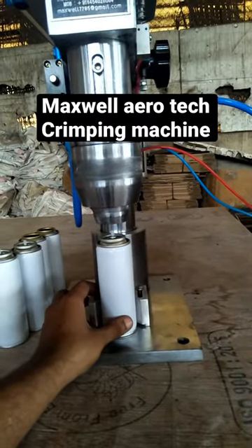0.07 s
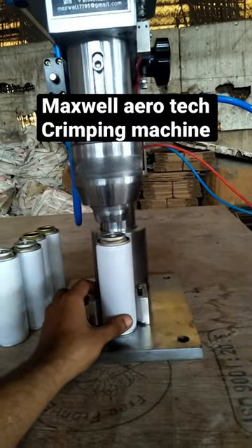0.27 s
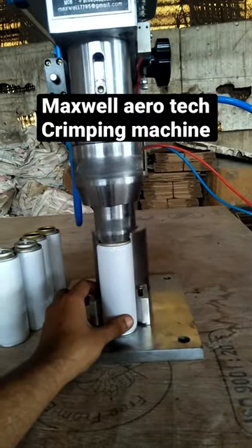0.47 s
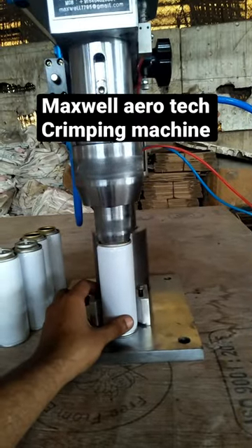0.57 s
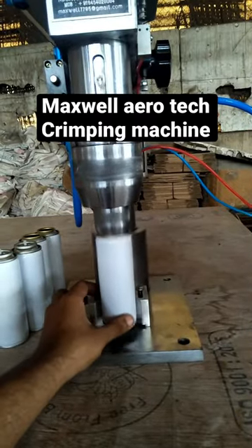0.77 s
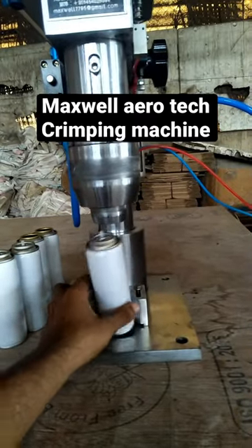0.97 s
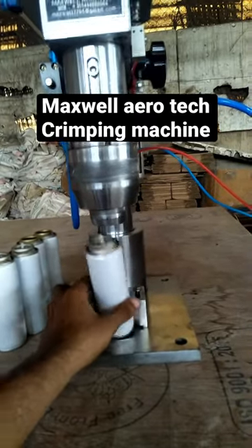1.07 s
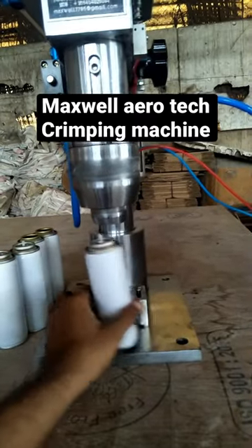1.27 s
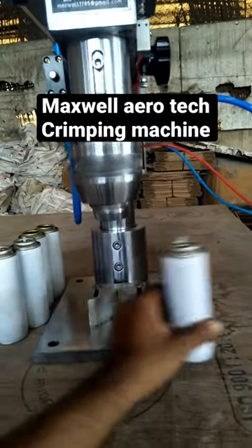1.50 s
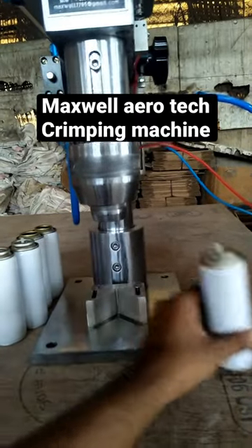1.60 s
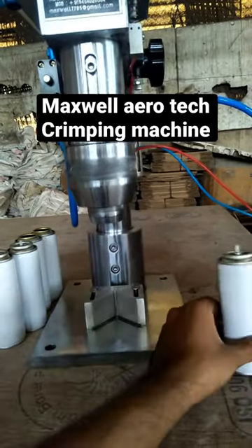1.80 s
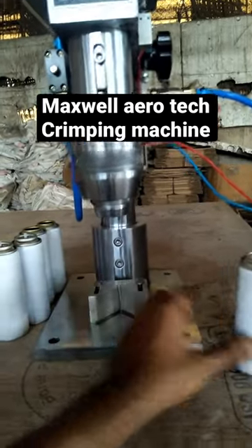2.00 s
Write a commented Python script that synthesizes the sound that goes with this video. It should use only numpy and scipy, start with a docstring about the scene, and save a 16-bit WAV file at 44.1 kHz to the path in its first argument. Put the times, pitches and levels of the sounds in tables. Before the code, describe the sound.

A pneumatic press lets out a loud two-stage hiss of air with thumps and metal clacks. The hiss cuts off, and a can rattles, clinks, scrapes and is set on a wooden bench in a slightly echoing workshop.

```python
"""In a workshop, a pneumatic press on a wooden bench crimps an aerosol can.
A valve pops and turbulent air hisses through a resonant port as the ram goes down, then brighter as it
returns; at each stage the ram thumps and shakes the bench. The freed can rattles against the steel head,
ringing in its normal modes, clinks and scrapes out of its holder, and is set down on the wooden top.
The room reverberates over a low background rumble."""
import sys
import numpy as np
from scipy import signal
from scipy.fft import rfft, irfft, next_fast_len
from scipy.io import wavfile
from scipy.ndimage import uniform_filter1d, map_coordinates

SR = 44100
rng = np.random.default_rng(int(sys.argv[2]) if len(sys.argv) > 2 else 0)


def int16_out(signal):
    """Quantize to a 16-bit WAV file."""
    q = np.round(np.clip(np.atleast_2d(signal).T, -1, 1) * 32767)
    wavfile.write(sys.argv[1], SR, q.astype(np.int16))


N = 90404
T = np.arange(N) / SR

# Exhaust strokes. Each row: opening and shutting times in seconds, level in dB, opening surge in dB.
STROKES = [(.204, .585, -21, 10), (.590, .888, -19.5, -1)]
# Spectra of the two jets and the shaking frame. Each row: frequency in Hz, relative level in dB.
DOWN_JET = [(88, -30.5), (150, -2.5), (264, -17), (430, -17), (598, -26.5), (937, -5.5), (1330, -16),
            (1750, -15.5), (2430, 0), (2790, -5.5), (3260, -14), (4040, -16.5), (4630, -26.5),
            (5300, -24.5), (6900, -34.5), (9300, -20.5), (12000, -30), (15800, -34)]
RETURN_JET = [(88, -37), (150, -12.5), (169, -25), (330, -12.5), (575, -19), (937, -9), (1120, -15.5),
              (1550, -9), (1780, -12.5), (2390, -4), (2900, -3.5), (3300, -16.5), (4040, -12.5),
              (4650, -26.5), (5410, -23), (6970, -30.5), (9000, -23), (12200, -26), (15800, -28)]
FRAME_SPECTRUM = [(30, -19), (55, -6.5), (90, 5), (130, -3), (200, -23), (400, -42.5)]
# Resonances of the exhaust ports. Each row: frequency in Hz, bandwidth in Hz, relative level in dB.
DOWN_PORT = [(866, 100, -23.5), (1597, 16, -17), (1904, 46, -13), (2334, 70, -12.5), (2401, 45, -3.5),
             (2521, 54, -5.5), (2722, 38, -2), (2978, 37, -8), (4950, 62, -29), (10340, 260, -34.5)]
RETURN_PORT = [(940, 100, -12), (1341, 70, -12), (1966, 52, -3), (2323, 80, -0.5), (2440, 80, -1),
               (2883, 67, -1.5), (3570, 200, -17), (4013, 130, -12.5), (5300, 180, -21), (12200, 400, -28)]
# Thumps of the ram. Each row: start in seconds, level in dB, pitch in Hz, cycles to the envelope's peak.
THUMPS = [(0.2055, -12, 233, 0.82), (.315, -26.5, 90, 0.99), (0.4426, -15, 193, 0.52),
          (0.5835, -12, 222, 0.61), (0.724, -20.5, 321, 1), (.871, -19, 105, 1.12),
          (0.900, -22.5, 129, 1.14)]
# Hard metal contacts. Each row: start in seconds, level in dB, pitch in Hz, relative can ring in dB.
CLACKS = [(0.2019, -11.5, 1260, -29), (0.4394, -11.5, 2170, -13.5), (0.5862, -15, 1970, -30),
          (0.9182, -4.5, 2060, -16), (.9780, -12, 1930, -20.5), (1.0267, -18, 1920, -20),
          (1.073, -39.5, 2130, -24.5), (1.0927, -21, 2010, -27.5), (1.1007, -28, 1920, -24)]
# Taps of the can on the holder and on the bench. Each row: start in seconds, level in dB.
CLINKS = [(1.333, -33.5), (1.3474, -41)]
KNOCKS = [(1.6446, -26), (1.6583, -39)]
# Normal modes. Each row: frequency in Hz, relative level in dB, time to decay by 60 dB in seconds.
CAN_MODES = [(1631, -11, 0.2), (2296, -5, 0.14), (2729, 0.5, 0.19), (2864, -6.5, 0.35), (2810, -19, 0.7),
             (3250, -4.5, 0.16), (9200, -37.5, .06), (12500, -22, 0.05)]
RIM_MODES = [(5480, -36, 0.053), (9000, -39, .06), (12410, -30, .05)]
HOLDER_MODES = [(427, -12, 0.042), (1090, -21, 0.25), (1195, -14.5, 0.1), (1870, -22, 0.062),
                (2100, -4, 0.081), (2360, -2, 0.052), (2683, 6.5, 0.042), (2837, 9, 0.015)]
BENCH_MODES = [(139.8, -4, 0.54), (256.5, -4.5, 0.55), (323, -3.5, .29), (430, -21, .28), (567, 1, 0.3),
               (800, -3.5, 0.5), (848, -12, 0.74), (910, -3.5, 0.6), (1052, 6.5, 0.19), (1145, 12.5, 0.15),
               (1352, -3, .2), (1760, 7, 0.088), (2150, 5, 0.068), (2370, 6, 0.09)]
# Spectra of impact noise. Each row: frequency in Hz, relative level in dB.
SHUDDER_SPECTRUM = [(40, -26), (85, -7), (200, -2.5), (400, -5), (650, -18.5), (2000, -66)]
METAL_CRACK = [(60, -40.5), (400, -9), (1000, -4), (2000, 7), (4000, -29.5), (7000, -46), (13000, -26),
               (16000, -45)]
KNOCK_CRACK = [(300, -17.5), (1100, -1), (1450, -2), (2200, 2), (2850, -9.5), (3400, -38), (8000, -47)]
WOOD_SPECTRUM = [(60, -17), (140, -8.5), (430, -11.5), (700, -6), (1100, -1), (1600, -9), (2200, -22),
                 (2800, -18.5), (3500, -35), (3950, -32), (4400, -52), (8000, -68.5)]
# Envelopes of the can's scrape, dragging base and handling. Each row: time in seconds, level in dB.
SCRAPE_LEVEL = [(1.35, -49), (1.40, -62), (1.46, -64.5), (1.495, -64), (1.518, -49), (1.54, -59.5),
                (1.56, -55.5), (1.585, -70.5), (1.63, -71)]
DRAG_LEVEL = [(1.50, -90), (1.513, -68), (1.56, -60.5), (1.59, -72.5), (1.64, -71.5)]
HANDLING_LEVEL = [(1.30, -75), (1.40, -54.5), (1.46, -80), (1.53, -80), (1.59, -88), (1.64, -82)]
# Spectra of those three and of the sliding rim. Each row: frequency in Hz, relative level in dB.
SCRAPE_SPECTRUM = [(120, -53), (200, -23), (312, -18.5), (440, -38), (677, -14), (885, -13.5), (968, -22.5),
                   (1140, -3.5), (1470, -23.5), (1680, -14.5), (2660, -7), (3640, -37), (7000, -61),
                   (9100, -71), (15400, -120)]
DRAG_SPECTRUM = [(200, -28.5), (330, -8), (480, -21), (690, -0.5), (800, 0.5), (950, -11), (1150, -2),
                 (1600, -36)]
HANDLING_SPECTRUM = [(40, -14.5), (100, -9.5), (140, 1.5), (200, -30.5), (320, -17.5), (500, -27.5),
                     (1500, -62.5)]
SLIDE_SPECTRUM = [(4300, -27), (5500, -11), (7600, -29), (8700, -12), (9100, -4), (9800, -21), (11900, -9),
                  (12500, 2), (13100, -10), (15800, -12)]
# Decay of the workshop's echo. Each row: frequency in Hz, reverberation time in seconds.
ROOM_T60 = [(100, .7), (300, .6), (900, .58), (2000, .48), (5000, .45), (12000, .38)]
# Colour of the echo and of the background. Each row: frequency in Hz, relative level in dB.
ROOM_GAIN = [(50, -20), (110, -12.5), (500, -7.5), (1200, -14.5), (2700, -17), (5000, -14), (12000, -20.5)]
BACKGROUND_SPECTRUM = [(25, -12), (60, 2.5), (130, 0.5), (200, -13.5), (400, -15.5), (900, -16.5),
                       (2200, -20.5), (3500, -29.5), (6000, -45), (15800, -48.5)]
# Threshold of the noise suppressor. Each row: frequency in Hz, power density in dB per Hz.
QUIET_THRESHOLD = [(140, -118), (300, -105), (600, -102), (1000, -104), (2500, -106), (4000, -125),
                   (8000, -145)]

CRACK_T60, CONTACT_RISE_S = .018, .0007  # decay and onset of a contact, both in seconds


def exhaust(stroke, spectrum, port):
    """Turbulence makes broadband noise, which excites the port's resonances; the flow shakes the frame."""
    opens, shuts, db, surge_db = stroke
    surge_s, crossover_hz, port_db, port_tilt = .018, 3600, 2, .15

    def port_response(f):
        resonances = sum((-1) ** k * amp(gain) * 1j * f * width / (hz * hz - f * f + 1j * f * width)
                         for k, (hz, width, gain) in enumerate(port))
        return resonances * amp(along(spectrum, f) * port_tilt)

    hollow = unit(filtered(rng.standard_normal(N), port_response))
    jet = unit(noise(spectrum) + amp(port_db) * hollow)
    body = filtered(jet, lambda f: 1 / (1 + (f / crossover_hz) ** 8))
    # The treble builds up later than the body and starts to fade later.
    fizz = (jet - body) * rise(.013, opens) * fade(.058, shuts + .022)
    flow = amp(db + surge_db * np.exp(-np.maximum(T - opens, 0) / surge_s) - .9 * wobble(60))
    closing = fade(.14, shuts)
    rumble = amp(-39.5) * noise(FRAME_SPECTRUM) * rise(.14, opens) * closing
    return rumble + flow * (body * rise(.001, opens) * closing + fizz)


def ram():
    """A short force pulse shakes the frame and leaves the bench humming in free vibration."""
    out = np.zeros(N)
    for s, db, hz, cycles in THUMPS:
        progress = T * hz / cycles
        push = np.sin(2 * np.pi * hz * T) * progress ** 2 * np.exp(1 - progress ** 2)
        shudder = amp(-8.5) * noise(SHUDDER_SPECTRUM) * fade(t60=.11)
        hum = amp(-21.5) * ping(hz=140.44, t60=.72)
        out += amp(db) * at(s, push + (shudder + hum) * rise(.003))
    return out


def clacks():
    """A hard impact is broadband: metal on metal gives a damped click, a crack and the can's ring."""
    click_top_hz = 4170
    out = np.zeros(N)
    for s, db, hz, ring_db in CLACKS:
        click = at(s, 3.6 * ping(hz, t60=.0046) * rise(.00039))
        click = filtered(click, lambda f: 1 / (1 + (f / click_top_hz) ** 6))
        crack = amp(-10) * noise(METAL_CRACK) * fade(CRACK_T60)
        # A fast random flutter makes the can's ring rough.
        can = amp(ring_db) * ring(CAN_MODES) * (1 + .4 * wobble(150))
        out += amp(db) * (click + at(s, (crack + can) * rise(.00049)))
    return bass_cut(out, hz=850)


def clinks():
    """Light impacts excite the modes of the holder and the thin overtones of the can's rim."""
    out = np.zeros(N)
    for s, db in CLINKS:
        holder = ring(HOLDER_MODES) + amp(-8) * noise(METAL_CRACK) * fade(t60=.06)
        tap = softened(at(s, holder) * rise(CONTACT_RISE_S, s))
        rim = at(s, ring(RIM_MODES) * (1 + .97 * wobble(480)) * rise(.0005))
        out += amp(db) * bass_cut(tap + rim, hz=490)
    return out


def set_down():
    """The can's rim strikes the wooden top, whose modes take a moment to build up and then ring on."""
    out = np.zeros(N)
    for s, db in KNOCKS:
        top = amp(-21) * ring(BENCH_MODES) + amp(-13) * noise(WOOD_SPECTRUM) * fade(t60=.35)
        rim = ping(hz=2115, t60=.013) + amp(.5) * noise(KNOCK_CRACK) * fade(CRACK_T60)
        out += amp(db) * at(s, rim * rise(CONTACT_RISE_S) + top * rise(.0023))
    return softened(out)


def scraping():
    """Sliding friction makes noise: the can scrapes, its base drags, its rim hisses, handling rumbles."""
    scrape = amp(curve(SCRAPE_LEVEL) + wobble(120)) * unit(bass_cut(noise(SCRAPE_SPECTRUM), hz=1188))
    drag = amp(curve(DRAG_LEVEL)) * noise(DRAG_SPECTRUM)
    slide = amp(-77.5 + 2.2 * wobble(70)) * noise(SLIDE_SPECTRUM)
    slide *= rise(.02, start=1.35) * fade(t60=.12, start=1.565)
    handling = amp(curve(HANDLING_LEVEL)) * noise(HANDLING_SPECTRUM)
    return scrape + drag + slide + handling


def reverberation(x):
    """Diffuse reflections form a noise tail; absorption gives each frequency its own decay time."""
    hz, t, bands = signal.stft(rng.standard_normal(SR), SR, nperseg=256)
    t60 = along(ROOM_T60, hz)[:, None]
    equal_energy = np.sqrt(2 * np.log(1000) / (t60 * SR))
    tail = signal.istft(bands * amp(-60 * t / t60) * equal_energy, SR, nperseg=256)[1]
    echo = at(.006, signal.fftconvolve(x, tail)[:N])
    return filtered(echo, lambda f: amp(along(ROOM_GAIN, f)))


def background():
    """Low-frequency noise under slight random amplitude modulation is heard as a faint rumble."""
    return amp(-67.5 + 1.2 * wobble(19)) * noise(BACKGROUND_SPECTRUM)


def amp(db):
    """Amplitude ratio of a level in decibels."""
    return 10 ** (np.asarray(db) / 20)


def unit(x):
    """Normalisation to rms 1."""
    return x / np.sqrt(np.mean(x ** 2) + 1e-20)


def along(points, hz):
    """Interpolation of (Hz, value) points on a logarithmic frequency axis."""
    frequencies, values = np.transpose(points)
    return np.interp(np.log(hz + 1), np.log(frequencies + 1), values)


def curve(points):
    """Linear interpolation of (seconds, dB) points, silent outside them."""
    return np.interp(T, *np.transpose(points), left=-120, right=-120)


def filtered(x, response):
    """A linear filter multiplies the spectrum by its frequency response."""
    size = next_fast_len(N + SR // 2)
    return irfft(rfft(x, size) * response(np.fft.rfftfreq(size, 1 / SR)), size)[:N]


def softened(x, cutoff_hz=3130):
    """A soft contact acts as a low-pass filter, here of third order."""
    return filtered(x, lambda f: 1 / np.sqrt(1 + (f / cutoff_hz) ** 6))


def bass_cut(x, hz):
    """A second-order high-pass filter falls 12 dB an octave below its cut-off."""
    return filtered(x, lambda f: (1j * f) ** 2 / (hz * hz - f * f + 1j * np.sqrt(2) * f * hz))


def noise(spectrum):
    """Filtering white noise gives coloured noise, scaled to rms 1."""
    return unit(filtered(rng.standard_normal(N), lambda f: amp(along(spectrum, f))))


def wobble(rate):
    """Smooth random modulation with rate knots a second."""
    return map_coordinates(rng.standard_normal(int(N * rate / SR) + 4), [T * rate])


def fade(t60, start=0):
    """Full level until start, then exponential decay by 60 dB every t60 seconds."""
    return np.exp(-np.log(1000) * np.maximum(T - start, 0) / t60)


def rise(tau, start=0):
    """Silence until start, then exponential approach to 1 with a time constant of tau seconds."""
    return 1 - np.exp(-np.maximum(T - start, 0) / tau)


def at(s, x):
    """A pure delay of s seconds."""
    return np.pad(x, (round(s * SR), 0))[:N]


def ping(hz, t60):
    """Free vibration of a damped oscillator."""
    return np.sin(2 * np.pi * hz * T) * fade(t60)


def ring(modes):
    """Superposition of a struck body's modes; each blow weights them a little differently."""
    return sum(amp(db + rng.normal(0, 1)) * rng.choice([-1, 1]) * ping(hz, t60) for hz, db, t60 in modes)


def suppressed(x, depth_db=-6.5):
    """Downward expansion turns each band down while its power lies below the threshold."""
    hz, _, bands = signal.stft(x, SR, nperseg=1024, scaling="psd")
    power = uniform_filter1d(np.abs(bands) ** 2, size=3, axis=0)
    power = uniform_filter1d(power, size=3, axis=1)
    excess = power / amp(along(QUIET_THRESHOLD, hz))[:, None] ** 2
    gain = amp(depth_db / (1 + excess ** 2))
    return signal.istft(bands * gain, SR, nperseg=1024, scaling="psd")[1][:N]


def scene():
    """Direct sound, reverberation and background add by superposition in one channel."""
    air = exhaust(STROKES[0], DOWN_JET, DOWN_PORT) + exhaust(STROKES[1], RETURN_JET, RETURN_PORT)
    direct = air + ram() + clacks() + clinks() + scraping() + set_down()
    return (direct + background() + reverberation(direct))[None]


def record(dry):
    """Band limiting removes the deepest bass and highest treble after quiet noise is suppressed."""
    low_hz, top_hz = 45.4, 15850
    treble_cut = lambda f: np.clip((top_hz - f) / 300 + .5, 0, 1) ** 2
    return np.array([filtered(bass_cut(suppressed(channel), low_hz), treble_cut) for channel in dry])


dry = scene()
out = record(dry)
int16_out(out)
```